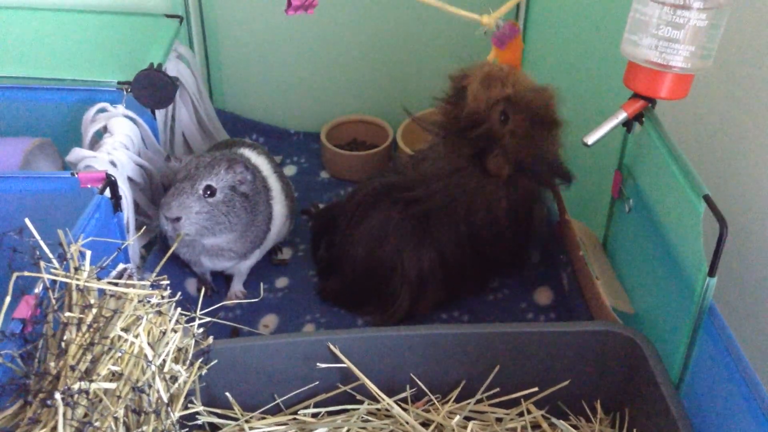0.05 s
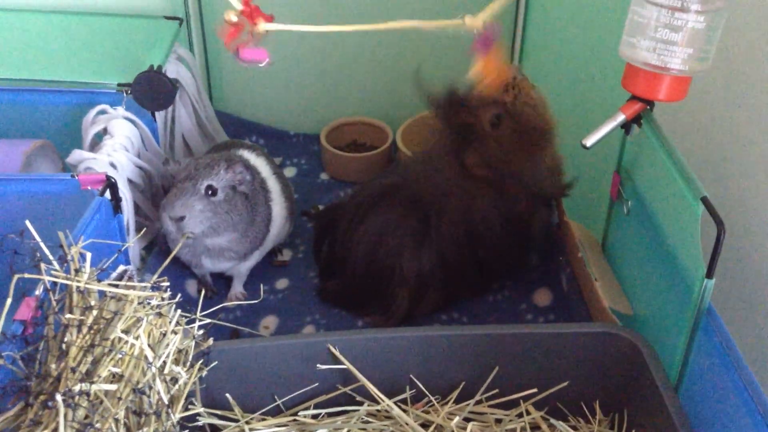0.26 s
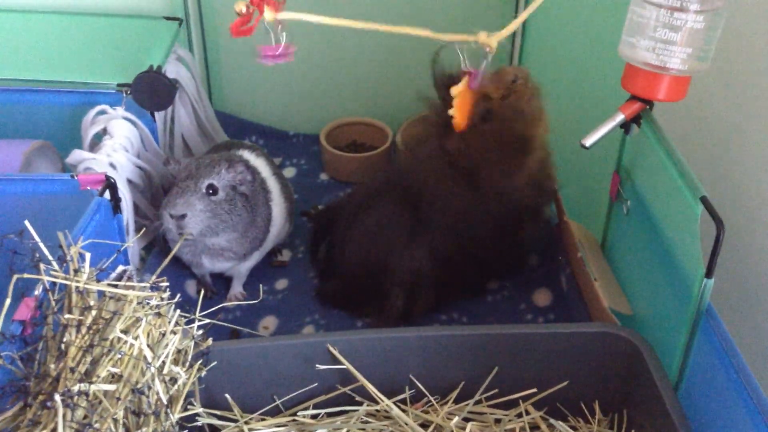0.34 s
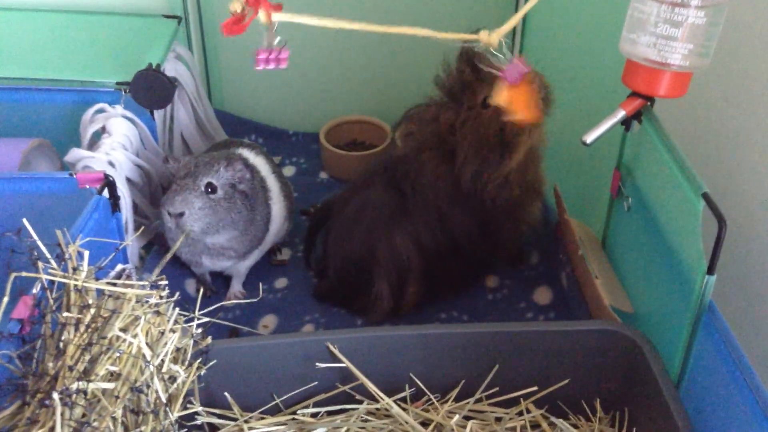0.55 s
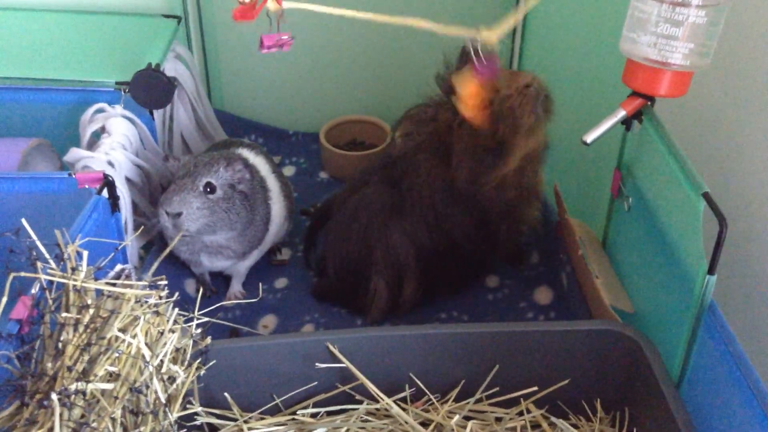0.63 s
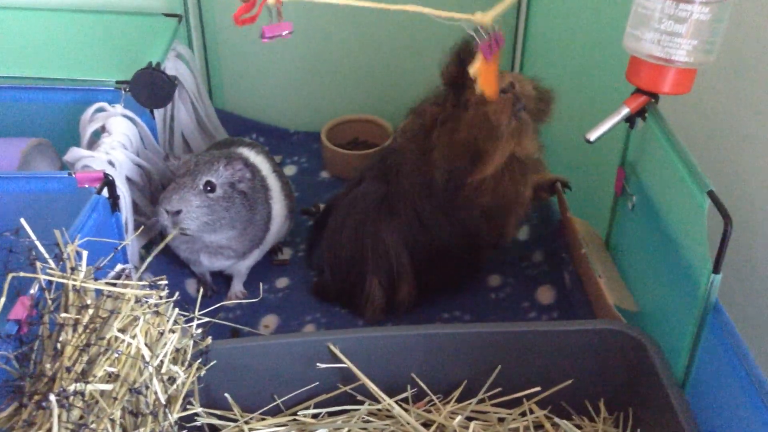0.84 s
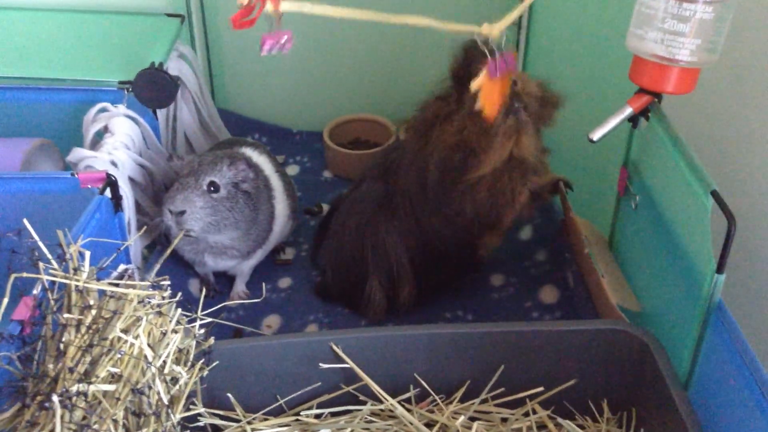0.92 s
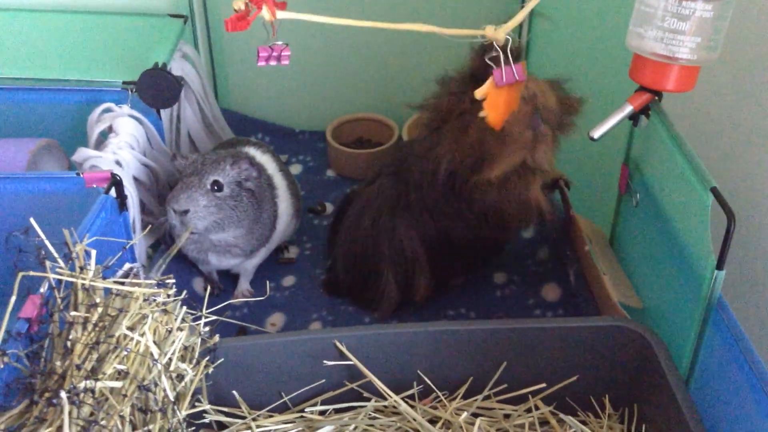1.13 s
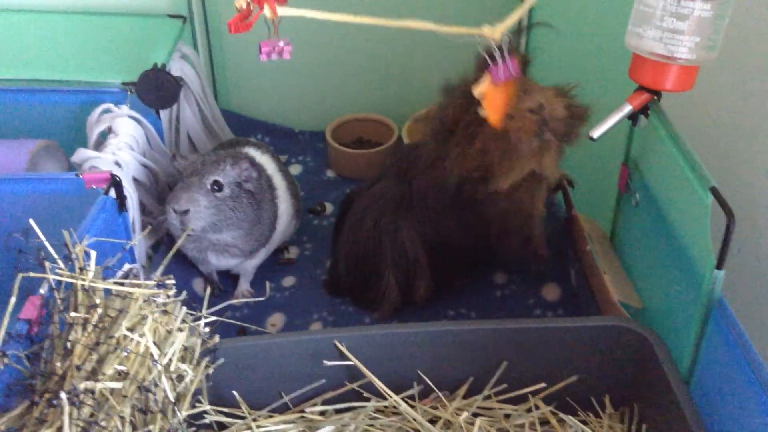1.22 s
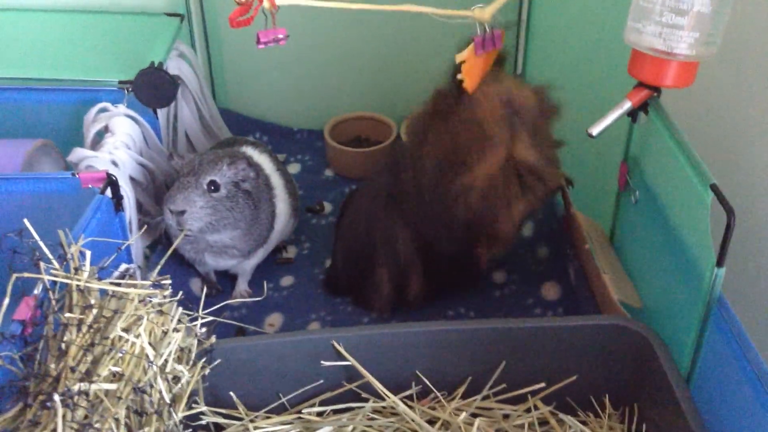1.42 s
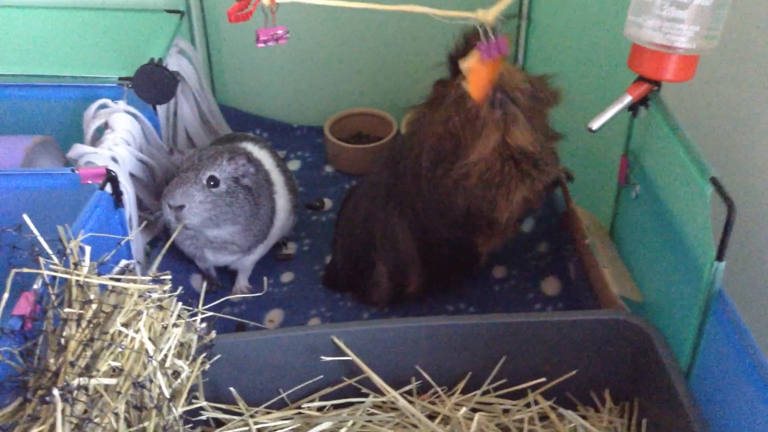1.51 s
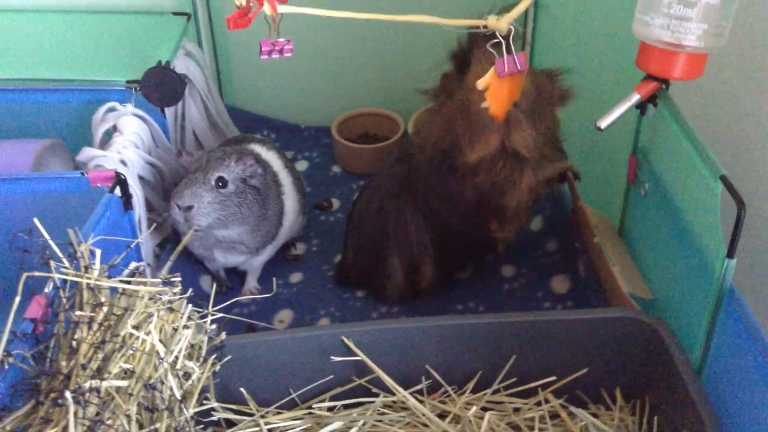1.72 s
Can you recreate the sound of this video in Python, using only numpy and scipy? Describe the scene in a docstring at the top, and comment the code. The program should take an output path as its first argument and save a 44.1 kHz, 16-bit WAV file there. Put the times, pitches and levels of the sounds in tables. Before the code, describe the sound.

In a small, quiet room, a little metal bell jingles and rattles unevenly while a guinea pig pulls at its toy. Paws scuff faintly and the pen knocks, then the ringing dies away, leaving small nibbling clicks.

```python
"""A guinea pig and its bell toy

A guinea pig tugs at a toy hung on a string in its pen, and a tiny bell on the toy jingles in bursts.
A loose pellet ticks and rolls inside the bell, making its shell ring with two main tones.
Short, duller clacks mix in; then the bell settles and small dry nibbling clicks go on.
Paws scuff the fleece, and the pen knocks and creaks softly, in a small quiet room."""
import sys
import numpy as np
from scipy import signal
from scipy.fft import rfft, irfft
from scipy.io import wavfile

SR = 44100
rng = np.random.default_rng(int(sys.argv[2]) if len(sys.argv) > 2 else 0)


def dump_mix(stems):
    """Bounce the given channels to the path in sys.argv[1] as a 16-bit WAV at rate SR."""
    frames = np.atleast_2d(stems).T  # one column per channel
    limited = np.clip(frames, -1, 1)  # hard clip at full scale
    pcm = np.round(limited * 32767).astype(np.int16)
    wavfile.write(sys.argv[1], SR, pcm)


N = 77175
T = np.arange(N) / SR


def undb(db):
    """Turn decibels into a volume multiplier."""
    return 10 ** (np.asarray(db) / 20)


def unit(x):
    """Scale to an average power of 1."""
    return x / np.sqrt(np.mean(x ** 2))


def curve(points):
    """Volume over time, joining (seconds, dB) points."""
    return undb(np.interp(T, *np.array(points).T))


def colour(x, points, tilt_db=0):
    """Shape the tone through (Hz, dB) points; a positive tilt, in dB per octave, brightens it."""
    hz, db = np.array(points).T
    octave = np.log2(np.fft.rfftfreq(4096, 1 / SR) + 1)
    gains = unit(undb(np.interp(octave, np.log2(hz), db) + tilt_db * octave))
    cepstrum = irfft(np.log(gains))
    # fold it so the filter never sounds ahead of its input
    cepstrum[1:len(cepstrum) // 2] *= 2
    cepstrum[len(cepstrum) // 2 + 1:] = 0
    return signal.fftconvolve(x, irfft(np.exp(rfft(cepstrum))))[:len(x)]


def fade(t60):
    """Die away by 60 dB over the fade time, t60 seconds."""
    return np.exp(-np.log(1000) * T[:int(t60 * SR)] / t60)


def ring(hz, t60, phase=0):
    """One fading tone."""
    env = fade(t60)
    return env * np.sin(2 * np.pi * hz * T[:len(env)] + phase)


def soften(x, attack):
    """Let a sound build up instead of starting at once."""
    return x * (1 - np.exp(-T[:len(x)] / attack))


def add(out, start, x):
    """Mix a sound in at a time in seconds."""
    i = int(start * SR)
    x, i = x[max(-i, 0):], max(i, 0)
    out[i:i + len(x)] += x[:N - i]


def burst(decay_s):
    """One contact: noise that dies within milliseconds."""
    env = fade(decay_s * np.log(1000))
    noise = env * rng.standard_normal(len(env))
    return noise * np.linalg.norm(env) / np.linalg.norm(noise)


def grains(per_second, spread_db):
    """Random tiny contacts of uneven size."""
    hits = rng.random(N) < per_second / SR
    signs = rng.choice([-1, 1], N)
    sizes = undb(spread_db * np.clip(rng.standard_normal(N), -2, 2))
    return unit(hits * signs * sizes)


def swell(start, length):
    """A smooth rise and fall."""
    return np.sin(np.pi * np.clip((T - start) / length, 0, 1))


# Paw strokes. Each row: start in seconds, length in seconds, level in dB, tilt in dB per octave.
PAW_SCUFFS = [(-.02, 0.12, -57, -2), (0.124, 0.084, -62, -0.7), (0.406, 0.082, -58, 0.6),
              (0.594, 0.12, -67.5, 1.5), (0.698, 0.083, -63.5, 0.5)]
# The tone of a scuff. Each row: frequency in Hz, level in dB.
SCUFF_TONE = [(60, -14), (120, -6.5), (200, 0), (400, 0.5), (700, -5), (1200, -10.5), (2500, -12),
              (5000, -14), (12000, -22.5)]

def paws():
    """Paws rub the fleece in soft, grainy scuffs."""
    out = np.zeros(N)
    for start, length, db, tilt_db in PAW_SCUFFS:
        rubbing = colour(grains(2500, spread_db=2.5), SCUFF_TONE, tilt_db)
        out += undb(db) * swell(start, length) * rubbing
    return out


# The tone of the quiet room. Each row: frequency in Hz, level in dB.
HUSH_TONE = [(18, -36), (30, -22), (59, -22), (234, 2), (288, -3.5), (404, -3.5), (978, -10), (1780, -8.5),
             (2770, -11.5), (4200, -11.5), (4650, -12), (5730, -12.5), (11900, -15), (15000, -13.5)]

def room_hush():
    """Faint, steady background noise."""
    return undb(-68) * colour(rng.standard_normal(N), HUSH_TONE)


# Pellet hits. Each row: start in seconds, then relative levels in dB of tick, low tone and high tone.
PELLET_HITS = [(.002, -48.5, -46.5, -62), (.058, -51.5, -53.5, -72), (.175, -58, -58, -49),
               (0.1968, -51, -57, -62), (0.2011, -50, -54, -59), (0.2102, -45, -53, -54),
               (0.2139, -33.5, -37, -57), (0.2175, -42, -42, -55), (.226, -43, -47, -63),
               (0.2317, -35.5, -52, -61), (0.236, -33, -38, -54), (0.2435, -41, -35.5, -41),
               (.2463, -37, -40, -50), (.276, -33, -31, -51), (.283, -41, -46, -37.5),
               (.2885, -42, -38.5, -59), (0.328, -44, -48, -52), (0.337, -52, -35.5, -53),
               (.348, -62, -65, -40.5), (.364, -50, -55, -62), (0.369, -49, -51, -47),
               (.4005, -38, -31.5, -48), (.410, -37, -31, -62), (.416, -47, -26.5, -47),
               (0.459, -48, -44, -45), (.469, -40, -49, -39.5), (0.4839, -36, -40.5, -50),
               (.491, -48.5, -39.5, -50), (.545, -39, -46, -38.5), (.553, -55, -44, -52),
               (0.562, -41, -44.5, -65), (.568, -58, -49.5, -67), (.605, -56, -53.5, -62),
               (0.63, -60, -48, -43.5), (0.655, -48, -37.5, -63), (.662, -42, -59, -63),
               (.670, -47, -62, -60), (.685, -60, -64, -58), (.708, -44.5, -38.5, -46.5),
               (0.721, -46, -33, -51), (.762, -53, -46, -45.5), (0.783, -59, -54, -46.5),
               (0.813, -60, -57, -59), (0.878, -64, -52.5, -62), (.926, -51, -56, -54),
               (0.984, -76, -60.5, -61)]
# The shell's weaker tones. Each row: pitch in Hz, fade time in seconds, dB added to the hit's tick level.
WEAK_TONES = [(5970, 0.046, -19.5), (6020, 0.048, -25), (6630, 0.052, -25), (8930, 0.068, -18),
              (9022, 0.068, -11.5), (12900, 0.031, -27), (13540, 0.036, -21), (14900, 0.027, -16)]
# The tone of a pellet tick. Each row: frequency in Hz, level in dB.
TICK_TONE = [(1000, -36), (4000, -22), (5200, -13.5), (5900, -6.5), (7300, -7.5), (8700, 2), (11000, -1.5),
             (12300, -2.5), (14000, 4), (15300, -0.5)]
LOW_HZ, HIGH_HZ, LOW_FADE_S, HIGH_FADE_S = 8903, 9920, 0.057, 0.044  # the two main tones

def bell():
    """Each pellet hit ticks and rings the shell, feeding its two main tones unevenly."""
    ticks, weak_rings = np.zeros(N), np.zeros(N)
    for start, tick_db, _, _ in PELLET_HITS:
        add(ticks, start, undb(tick_db + 5.5) * burst(decay_s=0.001))
        for hz, t60, db in WEAK_TONES:
            add(weak_rings, start, undb(tick_db + db) * ring(hz, t60, 2 * np.pi * rng.random()))
    low = shell_tone(LOW_HZ, LOW_FADE_S, [(start, db) for start, _, db, _ in PELLET_HITS])
    high = shell_tone(HIGH_HZ, HIGH_FADE_S, [(start, db) for start, _, _, db in PELLET_HITS])
    return colour(ticks, TICK_TONE) + weak_rings + low + high


def shell_tone(hz, t60, hits):
    """One main tone: each hit swells as the pellet chatters, adds energy and jolts the vibration."""
    swing = np.zeros(N, complex)  # holds the vibration's size and phase (place in its cycle)
    env = soften(fade(t60), attack=0.003)
    for start, db in hits:
        phase = np.angle(swing[max(int(start * SR), 0)])
        jolt = rng.choice([-1, 1]) * np.pi / 2 + 0.38 * rng.standard_normal()  # about a quarter cycle
        add(swing, start, undb(db + 5.5) * env * np.exp(1j * (phase + jolt)))
    return np.imag(swing * np.exp(2j * np.pi * hz * T))


# How loudly the pellet rolls. Each row: time in seconds, relative level in dB.
ROLL_LEVELS = [(0, -64), (.10, -67), (.145, -63.5), (.19, -62.5), (.24, -53), (.265, -57), (.345, -57.5),
               (.39, -60), (.425, -53.5), (.45, -57.5), (.495, -57), (.53, -71), (.555, -56.5), (.59, -61),
               (.665, -59.5), (.695, -66), (.73, -58), (.80, -62.5), (.85, -75), (.93, -73.5),
               (1.02, -82.5)]

def rolling():
    """Between hits the pellet skitters round the shell and keeps it ringing."""
    contacts = grains(2300, spread_db=3.5)
    low = unit(signal.fftconvolve(contacts, ring(LOW_HZ, LOW_FADE_S))[:N])
    high = unit(signal.fftconvolve(contacts, ring(HIGH_HZ, HIGH_FADE_S))[:N])
    ticks = colour(contacts, TICK_TONE, tilt_db=-2)
    return curve(ROLL_LEVELS) * (ticks + undb(-4) * low + undb(-10) * high)


# Bites on the toy. Each row: start in seconds, relative level in dB, tilt in dB per octave.
NIBBLES = [(0.1115, -47, 6.5), (.139, -47, 6), (.153, -48, 1), (.826, -53, -0.5), (0.902, -58.5, 6),
           (1.097, -51.5, 5), (1.112, -68.5, 1), (1.126, -60, 6), (1.144, -46.5, 1), (1.168, -57, -2),
           (1.477, -59.5, -2), (1.493, -61, -2), (1.519, -56.5, 0.5), (1.55, -59, -2), (1.566, -55.5, -1.5),
           (1.640, -57, 0), (1.646, -48.5, 1.5), (1.671, -59, 5), (1.718, -51, -1), (1.732, -60, 3)]
# The tone of a nibble. Each row: frequency in Hz, level in dB.
NIBBLE_TONE = [(500, -15), (2200, -10), (4500, -8), (6500, -5), (9000, -2.5), (12000, 0.5), (14000, 0),
               (15300, -4)]
# How loudly the toy crinkles. Each row: time in seconds, level in dB.
CRINKLE_LEVELS = [(1.06, -74.5), (1.125, -66.5), (1.19, -73), (1.44, -91), (1.485, -65.5), (1.59, -84),
                  (1.645, -71), (1.75, -76)]

def nibbling():
    """The nibbled toy crinkles and clicks, with a brief ring of its own under each click."""
    out = colour(curve(CRINKLE_LEVELS) * grains(1300, spread_db=4), NIBBLE_TONE)
    for start, db, tilt_db in NIBBLES:
        add(out, start, undb(db + 3.5) * colour(burst(decay_s=0.0017), NIBBLE_TONE, tilt_db))
        add(out, start, undb(db - 18.5) * ring(hz=4870, t60=0.012))
    return out


# Short clacks. Each row: start in seconds, strongest frequency in Hz, level in dB.
SHORT_CLACKS = [(0.161, 7700, -48.5), (0.2301, 5900, -41), (0.2378, 5700, -42), (0.415, 6700, -42),
                (.4215, 4100, -48), (0.55, 6600, -50), (0.637, 6250, -51.5), (.670, 3540, -58),
                (.732, 6140, -49.5), (0.89, 3520, -60), (1.144, 4800, -59)]

def clacks():
    """Short, duller clacks, mostly near 6000 Hz, many sounding with the pellet's hits."""
    out = np.zeros(N)
    spread = 2 ** 0.76  # 0.76 octaves to either side
    for start, hz, db in SHORT_CLACKS:
        tone = [(hz / spread, -26), (hz, 0), (hz * spread, -26), (SR, -50)]
        add(out, start, undb(db) * colour(burst(decay_s=0.002), tone))
    return out


# The pen's creaks. Each row: start in seconds, pitch in Hz, length in seconds, level in dB.
PEN_CREAKS = [(0.307, 2030, 0.012, -61.5), (0.478, 1880, 0.0056, -62.5), (0.582, 1940, 0.011, -64),
              (0.698, 1940, 0.0093, -54.5), (0.7177, 1880, 0.0052, -48.5), (0.882, 1830, .02, -66),
              (1.412, 1740, 0.039, -72.5)]

def creaks(width_hz=440):
    """The pen creaks under the pull: short swells of noise around one pitch."""
    out = np.zeros(N)
    for start, hz, length, db in PEN_CREAKS:
        band = signal.butter(2, [hz - width_hz / 2, hz + width_hz / 2], "band", fs=SR, output="sos")
        env = swell(start, length)
        creak = env * signal.sosfilt(band, rng.standard_normal(N))
        out += undb(db) * creak * np.linalg.norm(env) / np.linalg.norm(creak)
    return out


# Bumps on the pen. Each row: start in seconds, pitch in Hz, rise and fade times in seconds, level in dB.
PEN_KNOCKS = [(.3760, 780, 0.00032, 0.0065, -31), (.704, 336, 0.0016, 0.04, -52),
              (0.7198, 332, .002, .038, -38.5), (1.402, 314, 0.00086, 0.043, -55.5)]

def knocks(panel_hz=412):
    """Each dull knock comes with a brief snap and sets a panel of the pen humming."""
    out = np.zeros(N)
    snap, hum = -ring(hz=1760, t60=0.0032), ring(panel_hz, t60=0.25)
    for start, hz, attack, t60, db in PEN_KNOCKS:
        hum_share = min(panel_hz / hz, 1) ** 5  # high knocks barely stir the panel
        add(out, start, undb(db) * soften(ring(hz, t60), attack))
        add(out, start, undb(db - 10.5) * snap)
        add(out, start, undb(db - 19.5) * hum_share * hum)
    return out


def echoes(x, t60, delay_s):
    """Sound bouncing off walls blurs into a fading tail."""
    env = fade(t60)
    tail = np.r_[np.zeros(int(delay_s * SR)), env * rng.standard_normal(len(env))]
    return signal.fftconvolve(x, tail / np.linalg.norm(tail))[:N]


def scene(low_cut_hz=140):
    """Toy and animal between the pen's walls, thin in the bass, over the room's hush."""
    direct = bell() + undb(3.5) * rolling() + clacks() + nibbling() + creaks() + knocks() + paws()
    direct = signal.sosfilt(signal.butter(3, low_cut_hz, "high", fs=SR, output="sos"), direct)
    pen_echo = undb(-9) * echoes(direct, t60=0.02, delay_s=0.002)
    room_echo = undb(-16) * echoes(direct, t60=0.33, delay_s=0.009)
    return (direct + pen_echo + room_echo + room_hush())[None]


def record(dry, top_hz=15300):
    """Cut away the very highest treble."""
    return signal.sosfilt(signal.ellip(10, 0.2, 70, top_hz, fs=SR, output="sos"), dry)


dry = scene()
out = record(dry)
dump_mix(out)
```